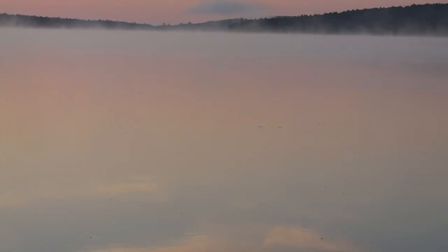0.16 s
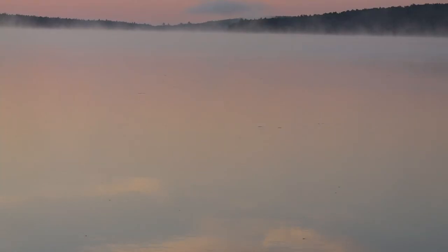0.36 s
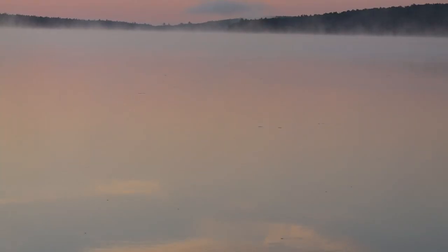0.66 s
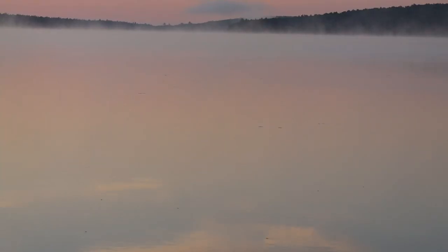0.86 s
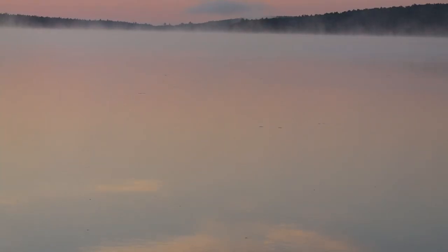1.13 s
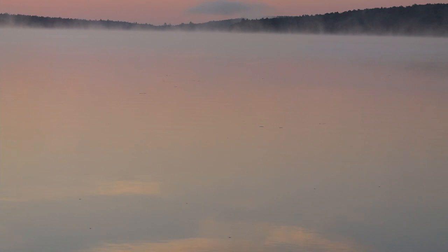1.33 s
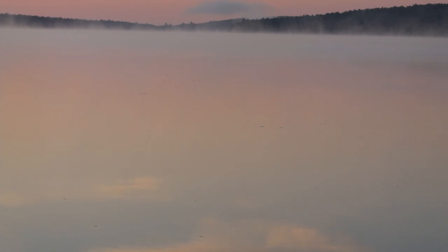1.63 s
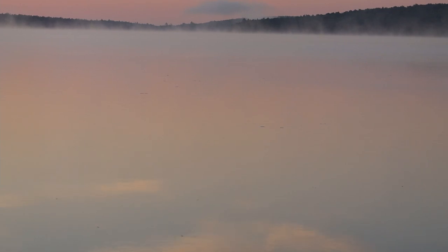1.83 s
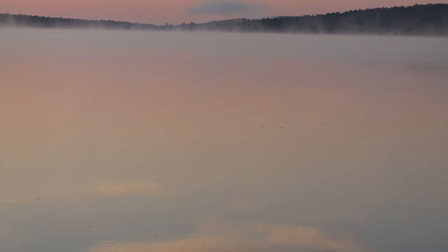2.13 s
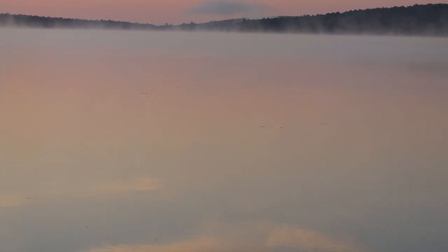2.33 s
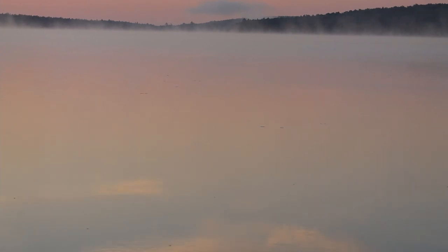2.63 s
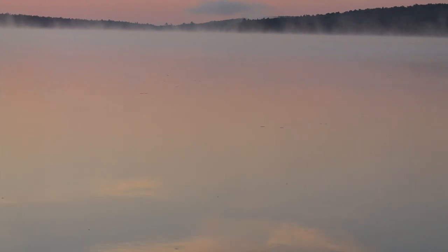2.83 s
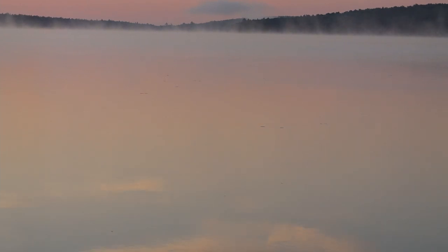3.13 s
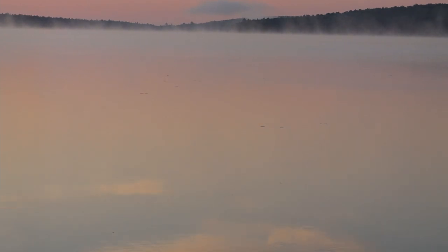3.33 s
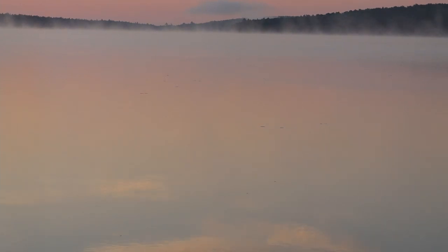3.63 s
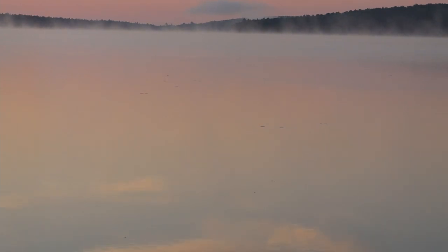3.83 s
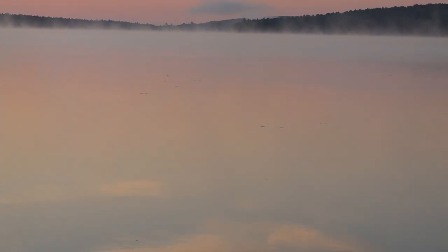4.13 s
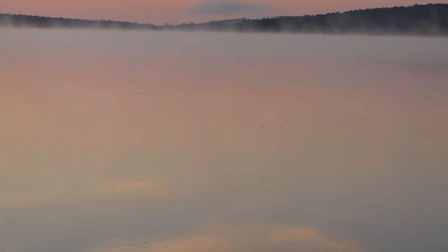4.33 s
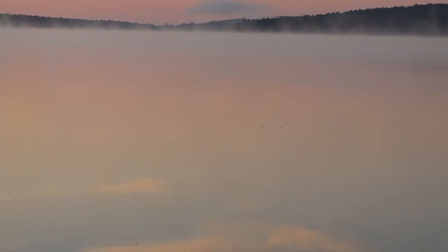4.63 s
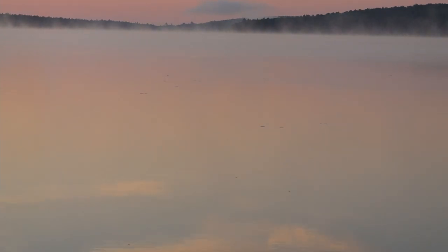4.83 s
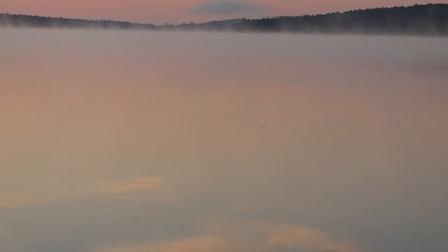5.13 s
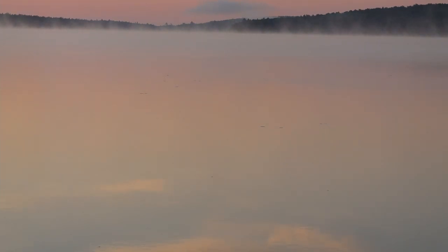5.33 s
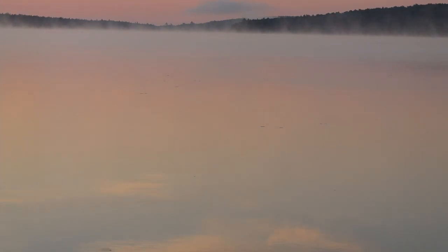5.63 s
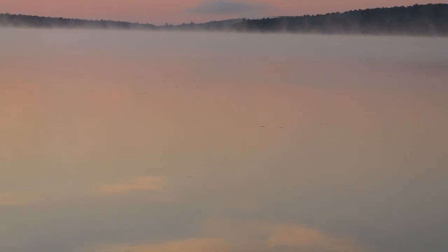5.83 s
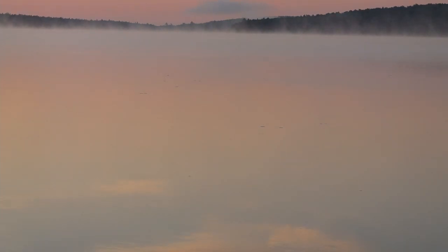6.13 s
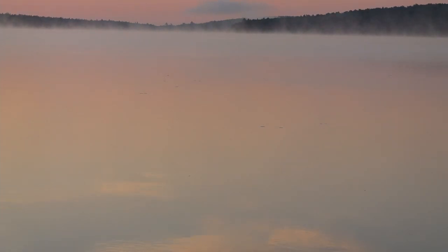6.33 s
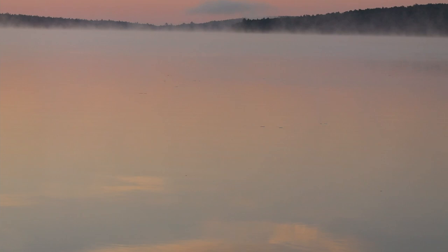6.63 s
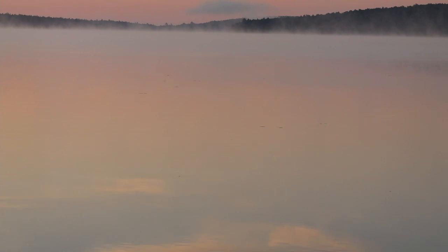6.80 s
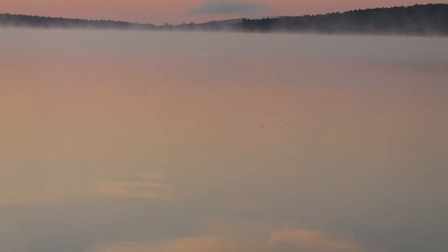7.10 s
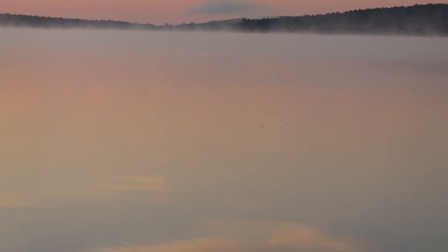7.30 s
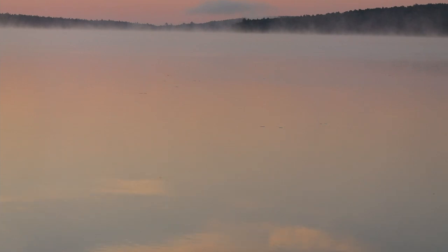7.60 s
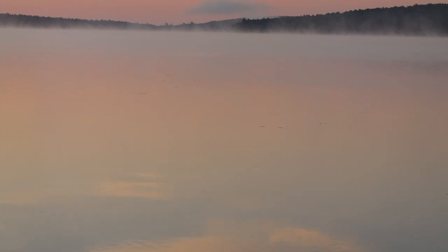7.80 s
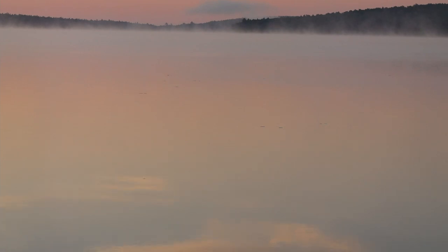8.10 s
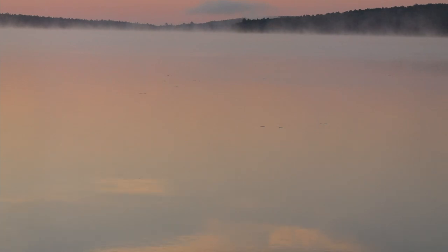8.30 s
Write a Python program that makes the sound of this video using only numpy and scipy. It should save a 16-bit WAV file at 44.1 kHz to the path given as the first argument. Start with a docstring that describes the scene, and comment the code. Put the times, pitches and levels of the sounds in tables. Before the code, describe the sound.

Quiet, steady airy hiss with small songbirds slurring faintly in distant trees. After about three seconds a far-off loon begins tremolo cries, each rising and breaking from a reedy low voice to a purer high one, with brief low hoots around them. The wooded shore rings on after each cry. A few tiny ticks and plops follow, then a sparrow's slow clear whistles. Distant, open lakeside microphone; birds centred, hiss slightly wide.

```python
"""Over a faint, even hiss, small songbirds slur and warble in distant trees: gliding sines blurred by echoes.
About three seconds in, a loon far out on a still lake gives the first of five tremolo cries.
Its harmonic voice breaks between a low and a high register, with short low hoots around the cries.
An inverted reflection off the water follows within milliseconds, and the wooded shore rings on.
Later come a few small ticks and plops as filtered noise, then a sparrow's slow, pure sine whistles."""
import sys
import numpy as np
from scipy import signal
from scipy.fft import rfft, irfft
from scipy.io import wavfile

SR = 44100
rng = np.random.default_rng(int(sys.argv[2]) if len(sys.argv) > 2 else 0)


def master(y):
    """Save y as 16-bit WAV."""
    cut = np.clip(np.atleast_2d(y).T, -1, 1)
    pcm = np.round(cut * 32767)  # scale
    wavfile.write(sys.argv[1], SR, pcm.astype(np.int16))


N = 373086
TIME = np.arange(N) / SR
FREQS = np.fft.rfftfreq(N, 1 / SR)

# the loon's cries: start t/s, end t/s, one quaver crest t/s, quaver rate there f/Hz, top of the arch t/s,
# low-register pitch at the top f/Hz, low-register quaver depth/share of pitch
CRIES = [(2.915, 3.72, 3.343, 9.66, 3.242, 798.0, 0.08), (4.165, 5.12, 4.542, 10.07, 4.539, 842.0, 0.063),
         (5.497, 6.49, 5.909, 9.96, 5.891, 887.0, 0.067), (6.93, 7.878, 7.384, 9.68, 7.291, 884.0, 0.049),
         (8.305, 8.46, 8.415, 7.38, 8.329, 656.0, 0.042)]


def from_db(db):
    """Turn decibels into gain."""
    return 10 ** (np.asarray(db) / 20)


def rms_one(x):
    """Scale a sound to rms 1."""
    return x / np.sqrt(np.mean(x ** 2) + 1e-20)


def gain_at(points, hz):
    """Read a table of f/Hz, level/dB on a log-frequency axis, as gain."""
    knots, db = np.transpose(points)
    log_hz = np.log(np.maximum(hz, 1))
    return from_db(np.interp(log_hz, np.log(knots), db))


def coloured(x, points):
    """Filter a sound by the response curve in a table."""
    return irfft(rfft(x) * gain_at(points, FREQS), N)


def drift(rate_hz):
    """Smooth random wander of rms 1: noise that weakens above the given rate."""
    spectrum = rfft(rng.standard_normal(N))
    return rms_one(irfft(spectrum / (1 + (FREQS / rate_hz) ** 2), N))


def scatter(x, t60, build_s):
    """Countless echoes off trees build up and die away by 60 dB in t60 seconds."""
    swell_and_decay = from_db(-60 * TIME / t60) * (1 - np.exp(-TIME / build_s))
    echoes = rng.standard_normal(N) * swell_and_decay
    return signal.fftconvolve(x, echoes / np.sqrt(np.sum(echoes ** 2)))[:N]


def whistled(notes, edge_s, waver, flicker_db):
    """Each note is a gliding sine with soft ends, a slight pitch waver and a flickering level."""
    out = np.zeros(N)
    wobble = 1 + waver * drift(37)
    for start, length, from_hz, to_hz, level_db in notes:
        on = (TIME >= start) & (TIME < start + length)
        age = TIME[on] - start
        pitch = (from_hz + (to_hz - from_hz) * age / length) * wobble[on]
        fade = np.clip(np.minimum(age, length - age) / edge_s, 0, 1)
        out[on] += from_db(level_db) * fade * np.sin(2 * np.pi * np.cumsum(pitch) / SR)
    return out * from_db(flicker_db * drift(36))


def air():
    """Still air as shaped noise, nearly the same in both ears and a little wider in the treble."""
    # colour of the hiss, relative: f/Hz, level/dB per Hz
    air_colour = [(12, -47), (20, 9), (27, -19), (54, -1), (207, -4), (549, -8), (597, -7.5), (686, -9),
                  (881, -9), (1580, -12), (1720, -13), (2760, -10), (3170, -11.5), (4550, -15.5),
                  (15500, -19)]
    # stereo width of the hiss: f/Hz, side over mid level/dB
    side_over_mid = [(30, -38), (80, -38), (170, -21.5), (400, -18.5), (3000, -20), (8000, -14.5),
                     (14000, -12.5)]
    mid = rms_one(coloured(rng.standard_normal(N), air_colour))
    side = rms_one(coloured(rng.standard_normal(N), air_colour))
    left_right = np.array([[1], [-1]])
    mid_rms_db = -57
    return from_db(mid_rms_db) * (mid + coloured(side, side_over_mid) * left_right)


def songbird_notes():
    """Phrases of slurs that alternate in direction, amid fainter pairs of slurs at random."""
    # phrases: start t/s, slurs/count, centre f/Hz, sweep of the first slur f/Hz, level/dB ahead of the trees
    phrases = [(.1, 1, 3300, 1100, -73), (.33, 1, 3330, -870, -70), (.43, 1, 3330, 800, -75),
               (.74, 2, 3100, 900, -66), (.87, 1, 2650, -50, -63), (.97, 1, 2830, -750, -63.5),
               (1.06, 1, 3350, 1150, -68), (1.33, 2, 3000, -550, -70), (1.64, 1, 3100, -650, -75),
               (1.89, 2, 3000, -1000, -70), (2.63, 3, 3150, -700, -67), (3.88, 2, 2900, -600, -70),
               (5.25, 1, 3100, -600, -70), (5.41, 4, 3140, -170, -61), (5.86, 1, 3650, 700, -70),
               (6.26, 1, 2800, -500, -63), (6.67, 1, 3470, 260, -65), (8.07, 1, 2750, -600, -69),
               (8.32, 1, 3100, -700, -69)]
    slur_s = .1
    chatter_slurs_per_s, chatter_db = 2, -80
    chatter_hz, chatter_spread_hz, chatter_sweep_hz = 3100, 400, -900
    pairs = int(chatter_slurs_per_s * N / SR / 2)
    chatter = []
    for when, height in rng.random((pairs, 2)):
        centre_hz = chatter_hz + chatter_spread_hz * (2 * height - 1)
        chatter.append((when * N / SR, 2, centre_hz, chatter_sweep_hz, chatter_db))
    notes = []
    for start, count, hz, sweep, db in list(phrases) + chatter:
        for k in range(int(round(count))):
            half_sweep = sweep / 2 * (-1) ** k
            notes.append((start + k * slur_s, slur_s, hz - half_sweep, hz + half_sweep, db))
    return notes


def songbirds():
    """Slurred sines in the thicket, where scattered echoes blur each note."""
    warbles = whistled(songbird_notes(), edge_s=.02, waver=.018, flicker_db=2.5)
    echoes = from_db(-2) * scatter(warbles, t60=.9, build_s=.0075)
    return from_db(7) * (warbles + echoes)


def per_cry(values):
    """Hold each cry's value, or row of values, until 0.1 s before the next cry."""
    starts = np.array(CRIES)[:, 0]
    which = np.maximum(np.searchsorted(starts - .1, TIME) - 1, 0)
    return np.array(values)[which].T


def register(pitch, level_db, bright_db, tilt_db, edge, jitter, flutter_db, count):
    """A reedy tone whose harmonics sweep through the throat's resonances and brighten or dull with effort.

    tilt_db = dB per kHz about 3 kHz, edge = dB of brightness per dB of level, count = number of harmonics.
    """
    # resonances of the loon's throat and bill: f/Hz, level/dB
    throat = [(550, -12), (720, -9), (900, -5.5), (1100, 0), (1320, -8.5), (1480, -1.5), (1600, 1),
              (1750, -2), (1900, -22), (2050, -31), (2300, -20.5), (2600, -31), (3250, -25), (3800, -29),
              (4250, -22.5), (4800, -37)]
    full_voice_db = -28
    pitch = pitch * (1 + jitter * drift(135))
    phase = 2 * np.pi * np.cumsum(pitch) / SR
    brightness_db = bright_db + edge * (level_db - full_voice_db)
    voice = 0
    for k in range(1, count + 1):
        # brightness and flutter fade in from 1800 to 2200 Hz
        overtone = np.clip((k * pitch - 1800) / 400, 0, 1)
        above_khz = np.minimum(k * pitch / 1000 - 3, .6)
        colour_db = overtone * (brightness_db + tilt_db * above_khz + flutter_db * drift(24))
        voice = voice + gain_at(throat, k * pitch) * from_db(colour_db) * np.sin(k * phase)
    return voice * from_db(level_db)


def loon():
    """Each cry is an arch of pitch with a slowing quaver, breaking from a reedy low register to a pure high one."""
    # upward breaks: start t/s, end t/s, high-register pitch at the arch top f/Hz, quaver depth/share of pitch
    breaks = [(3.243, 3.492, 1091.0, 0.057), (4.266, 5.01, 1126.0, 0.056), (5.066, 5.102, 1134.0, 0.038),
              (5.604, 6.378, 1122.0, 0.052), (6.428, 6.478, 1145.0, 0.036), (7.012, 7.858, 1115.0, 0.051)]
    # effort through each cry, one list per cry: t/s, level/dB before the quaver swells and strain
    effort = [
        [(2.915, -33.8), (2.94, -33.1), (2.99, -40.4), (3.03, -30.8), (3.2, -34.7), (3.34, -29.7),
         (3.45, -38.8), (3.68, -30.0), (3.72, -42.0)],
        [(4.165, -41.7), (4.2, -34.6), (4.24, -29.5), (4.55, -26.0), (4.74, -28.7), (4.97, -31.7),
         (5.03, -36.1), (5.07, -35.9), (5.12, -41.8)],
        [(5.497, -37.5), (5.51, -37.4), (5.58, -32.0), (5.72, -27.8), (5.95, -26.0), (6.3, -31.9),
         (6.39, -35.7), (6.49, -44.4)],
        [(6.93, -53.7), (6.98, -30.3), (7.03, -32.8), (7.3, -28.6), (7.7, -34.5), (7.82, -37.6), (7.878, -39.0)],
        [(8.305, -49.6), (8.41, -36.4), (8.46, -38.8)],
    ]
    # reediness, one row per cry: low-register overtone level/dB, high-register overtone level/dB
    brightness = [(5.5, -5.5), (-2, -4), (2, -3.5), (-2, -6), (-20, -20)]
    # how flat each cry starts: share of pitch
    scoops = [.02, .08, .09, .17, .05]
    attack_s, release_s = .01, .015
    quaver_slowing_per_s2 = 2.16  # the quaver slows as the breath runs out
    low_swell_db, high_swell_db = 1.2, 3.8  # louder on every quaver crest
    low_rise_per_s2, low_fall_per_s2, high_arch_per_s2 = 1.53, .67, .36  # share of pitch lost around the top
    scoop_s = .035  # the pitch settles and the quaver grows
    strain_bend, strain_db, strain_s = .085, -5, .014  # low register goes sharp and thins before a break
    break_s = .016  # the registers overlap this long
    bloom_db, bloom_s = -22, .06  # low-register overtones open up after each start
    drop, drop_s = .08, .015  # the low pitch falls away as each cry ends, share of pitch

    start, end, crest, rate, top, low_hz, low_depth = per_cry(CRIES)
    now = np.clip(TIME, start, end)
    unsettled = np.exp((start - now) / scoop_s)
    from_crest = now - crest
    quaver_cycles = rate * from_crest - quaver_slowing_per_s2 * from_crest ** 2 / 2
    quaver = (1 - unsettled) * np.cos(2 * np.pi * quaver_cycles)
    arch = (now - top) ** 2

    high_hz, high_depth, high_share, strain = np.zeros((4, N))
    for up, down, hz, depth in breaks:
        onward = TIME > up - break_s
        high_hz[onward], high_depth[onward] = hz, depth
        high_share += np.clip(np.minimum(TIME - up, down - TIME) / break_s + .5, 0, 1)
        strain += np.exp(np.minimum(TIME - up, 0) / strain_s) * (TIME < up + break_s)

    bend = strain_bend * strain - per_cry(scoops) * unsettled - drop * np.exp((now - end) / drop_s)
    low_arch = np.where(now < top, low_rise_per_s2, low_fall_per_s2) * arch
    low_pitch = low_hz * (1 - low_arch + low_depth * quaver) * (1 + bend)
    high_pitch = high_hz * (1 - high_arch_per_s2 * arch + high_depth * quaver)

    effort_db = np.interp(TIME, *np.concatenate(effort).T)
    low_db = effort_db + low_swell_db * quaver + strain_db * strain
    high_db = effort_db + high_swell_db * quaver
    low_bright_db, high_bright_db = per_cry(brightness)
    low_bright_db = low_bright_db + bloom_db * np.exp((start - now) / bloom_s)
    low = register(low_pitch, low_db, low_bright_db,
                   tilt_db=4, edge=.6, jitter=.00457, flutter_db=4, count=5)
    high = register(high_pitch, high_db, high_bright_db,
                    tilt_db=.3, edge=-.5, jitter=.00222, flutter_db=3.6, count=4)
    sounding = np.clip(np.minimum((TIME - start) / attack_s, (end - TIME) / release_s), 0, 1)
    return sounding * ((1 - high_share) * low + high_share * high)


def over_water(x):
    """The grazing reflection comes late and inverted, so a tone dips whenever its pitch crosses a null."""
    # path by way of the water, one row per cry: extra delay at its start t/ms, shrinking/ms per s, strength/0-1
    water_path = [(4.82, .25, .66), (4.5, .285, .84), (3.25, .3, .55), (3.79, .25, .79), (4.03, .29, .73)]
    # share of the reflection that survives the ripples: f/Hz, level/dB
    mirror = [(1750, 0), (2200, -8), (4500, -6)]
    delay_ms, shrink, strength = per_cry(water_path)
    age = TIME - per_cry(CRIES)[0]
    delay_s = (delay_ms - shrink * age) / 1000
    reflection = np.interp(TIME - delay_s, TIME, coloured(x, mirror))
    return x - np.clip(strength, 0, 1) * reflection


def wooded_shore(x):
    """The shore returns a coloured, long-ringing wash of scattered echoes."""
    # what the shore sends back: f/Hz, level/dB
    shore_colour = [(500, -5), (1040, -12), (1130, -11.5), (1230, -1), (1450, -11), (1600, -9),
                    (1750, -3.5), (2500, 1), (5000, 2)]
    return from_db(-11.5) * scatter(coloured(x, shore_colour), t60=4.0, build_s=.037)


def hoots():
    """Short low hoots around the cries, as gliding sines."""
    # hoots: start t/s, length t/s, start f/Hz, end f/Hz, level/dB
    hoot_notes = [(3.74, .05, 630, 610, -58), (3.84, .09, 558, 543, -69.5), (5.165, 0.068, 555, 540, -59),
                  (6.47, .04, 640, 560, -52), (6.9, .045, 580, 610, -59)]
    return whistled(hoot_notes, edge_s=.012, waver=.01, flicker_db=1.0)


def ticks():
    """Each small tick or plop is a decaying noise burst in one broad resonance, without echoes."""
    # ticks: start t/s, centre f/Hz, width f/Hz, decay t/s, level/dB at the start of the burst
    tick_list = [(4.655, 450, 350, 0.011, -51), (5.073, 3050, 2980, 0.0097, -49.5),
                 (5.155, 1770, 700, 0.0079, -45.5), (5.156, 6960, 2500, 0.0051, -51)]
    out = np.zeros(N)
    for start, hz, width, decay, level_db in tick_list:
        edges = [max(hz - width / 2, 50), hz + width / 2]
        band = signal.butter(2, edges, "band", fs=SR, output="sos")
        burst = rng.standard_normal(N) * (TIME >= start) * np.exp(-np.abs(TIME - start) / decay)
        bandwidth_gain = np.sqrt(SR / 2 / width)  # makes up for the noise outside the band
        out += from_db(level_db) * bandwidth_gain * signal.sosfilt(band, burst + 1e-18)
    return out


def sparrow():
    """Slow, pure whistles that sag a little about their pitch, with short echoes off the trees."""
    # whistles: start t/s, length t/s, mid-note f/Hz, level/dB ahead of the mix
    whistle_list = [(5.3, .14, 3330, -55.5), (5.55, .17, 3260, -52), (6.17, .2, 4390, -55),
                    (6.34, .28, 4445, -54.5), (6.83, .35, 4365, -55.5), (7.27, .2, 4325, -62.5),
                    (7.47, .14, 4300, -56), (7.66, .27, 4300, -57), (7.97, .25, 4275, -57),
                    (8.22, .24, 4290, -60)]
    sag_hz_per_s = 130
    notes = []
    for start, length, hz, db in whistle_list:
        half_sag = sag_hz_per_s * length / 2
        notes.append((start, length, hz + half_sag, hz - half_sag, db))
    whistles = whistled(notes, edge_s=.018, waver=.0024, flicker_db=2.8)
    return from_db(-.5) * whistles + from_db(-3) * scatter(whistles, t60=.58, build_s=.0093)


def scene():
    """All the birds are straight ahead; only the hiss has width."""
    cry = loon() + hoots()
    lake = over_water(cry) + wooded_shore(cry)
    return air() + songbirds() + lake + ticks() + sparrow()


def record(dry):
    """The top is cut steeply."""
    cutoff_hz = 15600
    return irfft(rfft(dry) / np.sqrt(1 + (FREQS / cutoff_hz) ** 400), N)


dry = scene()
out = record(dry)
master(out)
```